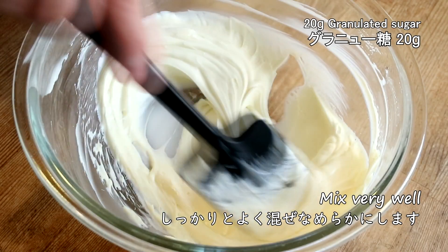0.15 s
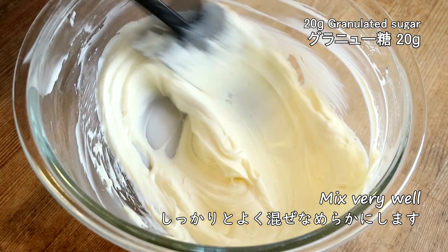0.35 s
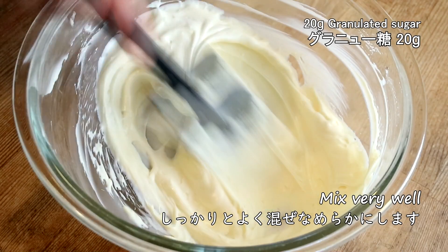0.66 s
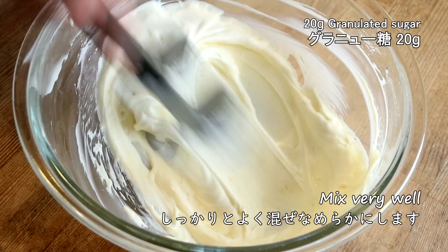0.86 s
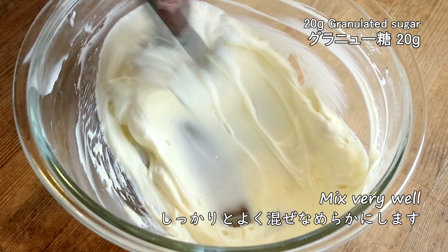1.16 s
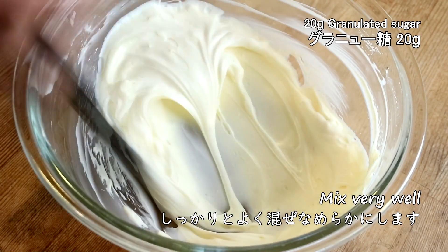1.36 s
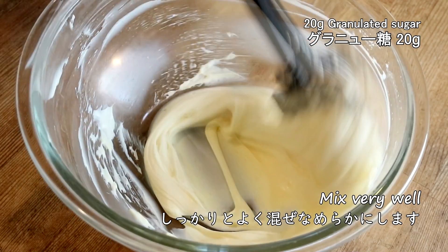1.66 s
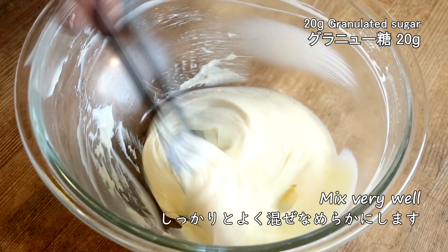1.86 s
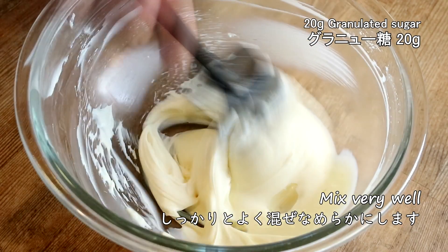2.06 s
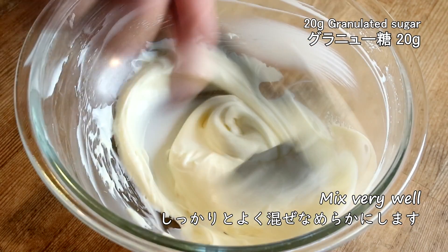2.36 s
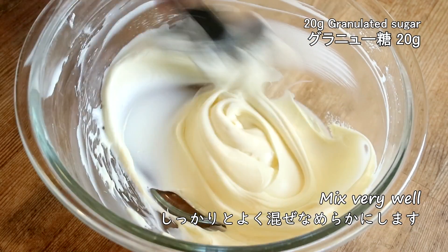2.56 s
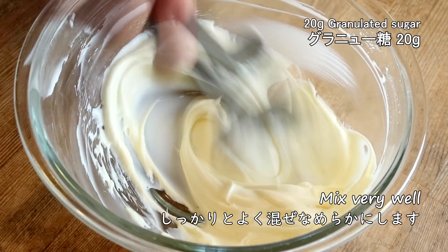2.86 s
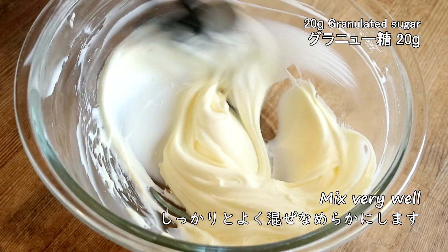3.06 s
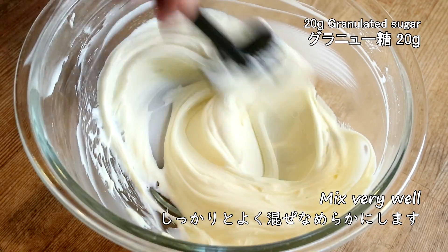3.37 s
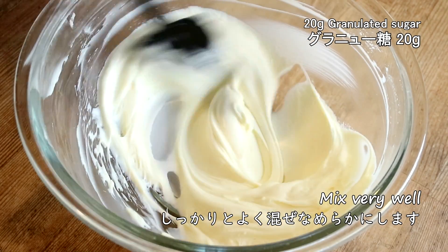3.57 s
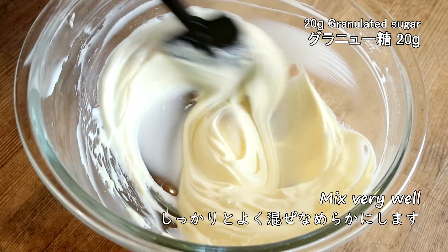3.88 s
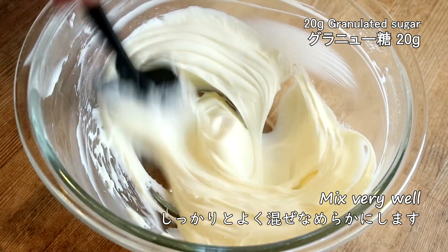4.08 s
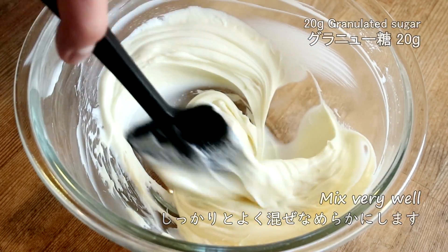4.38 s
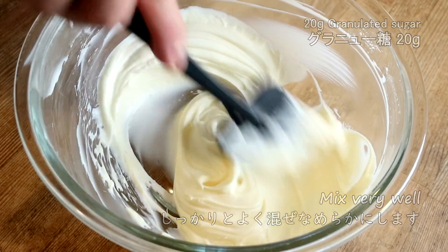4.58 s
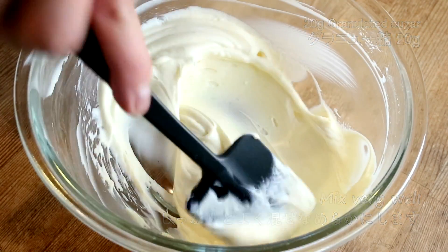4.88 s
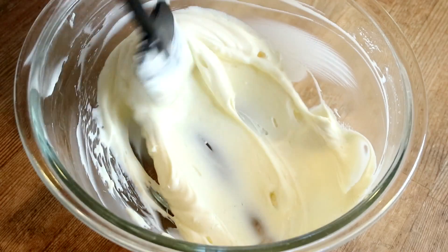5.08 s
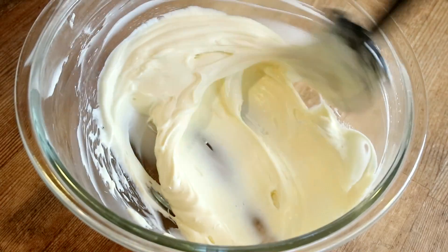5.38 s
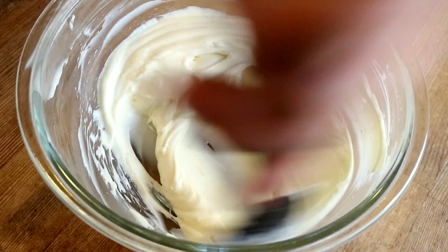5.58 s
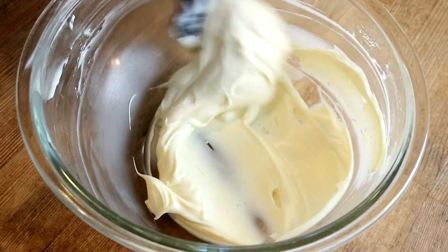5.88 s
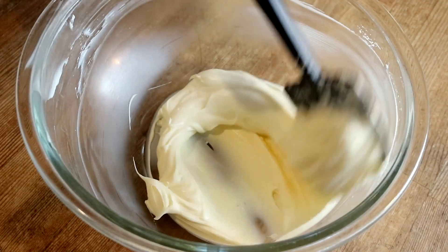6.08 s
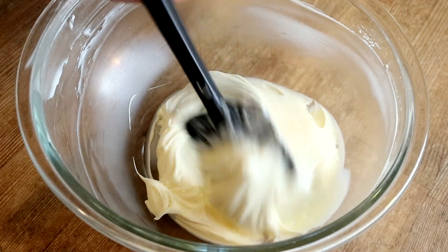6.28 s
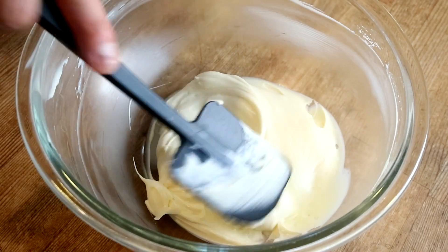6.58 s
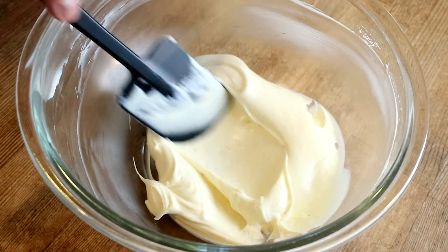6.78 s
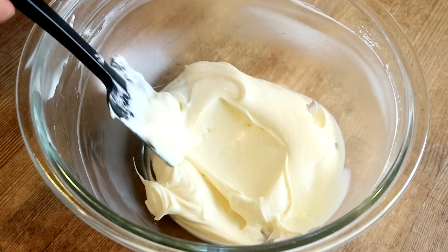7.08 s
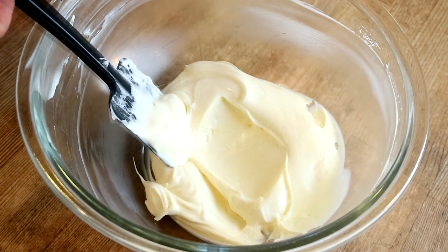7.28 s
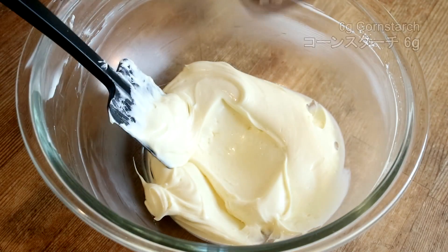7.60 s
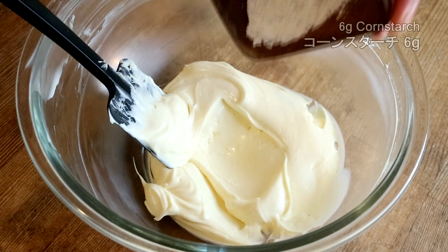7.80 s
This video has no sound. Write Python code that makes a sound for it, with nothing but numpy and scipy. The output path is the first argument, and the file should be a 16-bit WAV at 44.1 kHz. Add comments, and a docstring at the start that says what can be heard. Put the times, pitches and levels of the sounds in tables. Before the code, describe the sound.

A quiet kitchen with soft air noise and a faint low appliance hum, captured close to a glass bowl. At 0 s a short sticky smear with small wet clicks; at 0.4 a crisp double plop, then scattered squelches and soft table thuds around 0.7, 1.1 and 1.4. From about 2 to 2.7 light pops and crackling drags gather quickly. A big hollow gloop bursts at 2.75, followed by smears, low thumps and, at 2.99, one hard, short glassy knock with tiny rebounds. Further large, deep plops land at 3.25, 3.8 and 4.1, with busy wet slaps and thuds between, especially around 3.5. Mixing thins: a plop at 4.7, another at 5.1, faint squelches and a brief drag near 5.7 to 5.85. Barely audible rubbing ends by 6.7; a very faint smear at 7.4 marks the spatula being laid down, then hum and air until 8.

```python
"""Quiet kitchen: a silicone spatula beats thick cream batter in a glass bowl on a wooden table.
Pockets burst as damped cavity tones with torn-film noise; the blade smears as hiss and ringing grains.
Strokes thud in low table modes over a pressed rumble; one hard knock rings the bowl's modes.
Beneath lie shaped room noise and an appliance's sine hum; echoes and a diffuse tail form the room."""
import sys
import numpy as np
from scipy import signal
from scipy.fft import rfft, irfft, next_fast_len
from scipy.io import wavfile

SR = 44100
rng = np.random.default_rng(int(sys.argv[2]) if len(sys.argv) > 2 else 0)


def pcm_store(signal):
    """Save signal as 16-bit PCM."""
    levels = np.round(np.clip(np.atleast_2d(signal), -1, 1) * 32767)
    wavfile.write(sys.argv[1], SR, levels.astype(np.int16).T)


N = 350139

# Kitchen air spectrum. Each row: frequency in Hz, relative density in dB per Hz.
AIR_SPECTRUM = [(20, -15), (35, -7.5), (52, -6.5), (75, -1.5), (100, -10.5), (140, -6), (190, -14.5),
                (300, -11.5), (450, -15.5), (750, -18.5), (1300, -24.5), (3000, -27), (9000, -36.5),
                (14000, -47.5)]
# Left-right likeness of the air. Each row: frequency in Hz, likeness from -1 (opposed) to 1 (alike).
AIR_LIKENESS = [(25, 1), (60, 1), (150, 0.86), (300, 0.39), (640, 0.02), (1400, -0.14), (3000, -0.55),
                (12000, -0.6)]
AIR_RMS_DB = -59
# Appliance hum. Each row: frequency in Hz, rms in dB.
HUM_PARTIALS = [(59.4, -59), (118.6, -62.5), (237.3, -70.5), (328.4, -78), (980, -78.5)]

# Blade drags, the last as the spatula is laid down. Each row: peak time in seconds, peak drive in dB,
# length (sum of swell and fade time constants) in seconds, sticky treble against the dull part in dB.
DRAGS = [(0.0, -41.5, 0.05, -11.5), (0.052, -48, 0.038, -10), (0.777, -60, 0.037, -12),
         (1.362, -61, 0.048, 2.5), (1.47, -52.5, 0.04, -6), (2.023, -63.5, 0.26, -12),
         (2.198, -60, 0.081, -1), (2.285, -59, 0.078, -21), (2.336, -49.5, 0.011, 11.5),
         (2.442, -55.5, 0.071, 7), (2.559, -54.5, 0.08, -3), (2.633, -57, 0.07, -5), (2.756, -46, .1, -3),
         (2.946, -48.5, .03, -1), (3.01, -44.5, 0.16, -5.5), (3.263, -47, 0.038, -2),
         (3.345, -59, 0.054, 1), (3.49, -56.5, 0.37, -2), (3.537, -43, 0.033, -6),
         (3.622, -57, 0.076, -4.5), (3.783, -45.5, 0.045, -5.5), (3.857, -57, .12, -1.5),
         (4.082, -47.5, 0.0587, -6), (4.204, -60, 0.114, 3.5), (4.313, -49.5, 0.023, 6.5),
         (4.705, -49.5, 0.038, -2), (5.018, -63.5, 0.12, -9), (5.682, -53, 0.093, -12),
         (5.799, -65, 0.16, -2), (7.383, -67, 0.44, -3)]
SWELL_SHARE = 0.36  # of the drag length; the rest is fade
RUB_DB, MIXING_ENDS_S = -77.5, 6.7  # light rub between drags
# Colour of the dragging. Each row: grain pitch in Hz, relative gain in dB.
SMEAR_COLOUR = [(120, -5.5), (300, -14.5), (550, -1), (900, 6.5), (1600, 4.5), (2300, -4.5), (3500, -10.5),
                (6000, -9.5), (11000, -20), (16000, -42.5)]

# Blade presses the bowl on the table. Each row: time in seconds, level in dB before the thud trim.
PUSHES = [(0.002, -45.5), (0.678, -36), (1.041, -36.5), (1.355, -43.5), (2.022, -45), (2.561, -35.5),
          (2.861, -34), (2.996, -32), (3.533, -32), (4.604, -45), (4.663, -40), (4.983, -43)]
# Table and bowl under a push. Each row: multiple of TABLE_HZ, mean relative level in dB, t60 in seconds.
TABLE_MODES = [(0.578, -16, 0.8), (0.799, -8, 0.31), (0.998, 4, 0.21), (1.219, -5, .2), (1.6, -12.5, 0.25),
               (2.3, -13, 0.18)]
TABLE_HZ = 132.63

# Clearest bursting air pockets. Each row: time in seconds; plop, smack, squelch and spit level in dB
# before the trims in pops(); cavity, squelch and spit frequency in Hz.
POCKETS = [(0.003, -38, -48, -62, -66, 720, 2500, 6000), (0.0095, -41.5, -55, -56, -68, 720, 2600, 6000),
           (0.043, -43, -58, -53.5, -69, 760, 3500, 5200),
           (0.3863, -28.5, -38.5, -42.5, -53, 697, 2960, 8500),
           (0.401, -61, -31, -50, -47.5, 730, 2440, 5640), (0.405, -30.5, -58, -35.5, -58, 724, 3970, 5550),
           (0.6711, -40.5, -43, -48.5, -55, 820, 2590, 5360),
           (0.787, -49.5, -51, -46.5, -66, 760, 2920, 7000),
           (0.7936, -40, -42.5, -43, -52, 640, 3530, 6200), (1.0295, -53, -45, -51, -63, 810, 3570, 5800),
           (1.0885, -47, -55, -66, -78, 865, 2410, 6000), (1.125, -28.5, -36, -32.5, -40, 640, 4220, 7300),
           (1.352, -63, -62, -54.5, -68, 754, 3620, 6300), (1.4555, -50, -38.5, -50, -64, 840, 1850, 5800),
           (2.08, -49, -61, -77, -75, 726, 2360, 6000), (2.146, -46.5, -51, -61, -67, 546, 2650, 6000),
           (2.189, -50, -53, -57, -76, 760, 2900, 6000), (2.2072, -35, -31, -43.5, -53.5, 760, 2590, 5250),
           (2.228, -37, -55, -61, -80, 796, 2600, 6000), (2.2874, -50, -54, -61, -80, 596, 2500, 6000),
           (2.3215, -41.5, -39, -54, -62, 860, 2600, 6000),
           (2.3258, -30.5, -32.5, -37.5, -47, 925, 3830, 6100), (2.42, -57, -49, -41, -53, 760, 3500, 5200),
           (2.448, -65, -57, -46.5, -47.5, 758, 3380, 6200),
           (2.4979, -56, -57, -40.5, -60, 543, 3804, 5530),
           (2.509, -64, -62.5, -46.5, -61, 700, 4114, 5560),
           (2.537, -58.5, -51, -54, -71.5, 760, 2400, 6000),
           (2.5632, -43.5, -45, -55, -54.5, 691, 2560, 9500),
           (2.5866, -50.5, -56, -57, -58, 762, 3500, 6130),
           (2.6252, -57.5, -49.5, -52, -71, 760, 2397, 6000),
           (2.6847, -46.5, -42, -43, -55, 762, 2500, 7500),
           (2.6995, -56.5, -50, -49.5, -64, 762, 3750, 6300),
           (2.7153, -45.5, -34.5, -33.5, -66.5, 850, 3020, 6000),
           (2.7409, -12.5, -25.5, -19.5, -37, 595, 2950, 6800),
           (2.8552, -35.5, -28.5, -34.5, -45.5, 884, 2700, 5900),
           (2.9499, -35.5, -37, -26.5, -42, 840, 2790, 9500),
           (3.1082, -38.5, -36, -27.5, -36, 960, 3660, 4840),
           (3.2275, -69.5, -41.5, -41, -60.5, 762, 2780, 5500),
           (3.2586, -11.5, -36, -33, -40.5, 525, 2570, 5900),
           (3.3963, -25.5, -26.5, -26.5, -42.5, 720, 3092, 5760),
           (3.49, -59, -56, -57.5, -60.5, 765, 2922, 5300),
           (3.521, -31.5, -32.5, -47, -57, 640, 2503, 6000),
           (3.5311, -30, -29, -28, -65.5, 790, 2100, 6000), (3.537, -27, -28, -43.5, -49, 720, 2573, 5500),
           (3.6025, -55.5, -57, -45, -78, 760, 2520, 6000),
           (3.655, -48.5, -39, -33.5, -42, 750, 3000, 6040),
           (3.6645, -24.5, -31.5, -27, -61.5, 727, 3190, 6300),
           (3.746, -30.5, -37.5, -52.5, -64, 828, 2600, 6000),
           (3.759, -48, -36.5, -40.5, -64, 754, 2050, 6000),
           (3.7824, -12, -34, -23.5, -41, 555, 2920, 5600), (3.8728, -57, -61, -49, -64, 760, 2800, 6000),
           (3.933, -64.5, -60, -45, -61, 793, 3520, 5970),
           (4.021, -51.5, -52.5, -45.5, -49, 756, 3700, 7200),
           (4.061, -59.5, -58.5, -52, -61, 756.5, 3620, 6000),
           (4.0761, -12.5, -30, -30, -42, 560, 2368, 5200),
           (4.206, -53.5, -52, -48, -47.5, 760, 3807, 6400),
           (4.3005, -61, -49, -46.5, -39.5, 743, 3300, 9000), (4.35, -43, -48, -36.5, -55, 753, 2650, 6000),
           (4.627, -39.5, -44, -77, -84, 723, 2000, 6000), (4.6931, -23, -36.5, -45, -64, 630, 2400, 5200),
           (4.7176, -42, -37.5, -39.5, -70, 666, 3380, 6000), (4.8539, -53, -61, -52, -81, 762, 3030, 6040),
           (5.0997, -27, -33.5, -36.5, -46, 657, 3073, 8100),
           (5.106, -40.5, -58, -50.5, -47, 700, 3200, 5100), (5.649, -58, -53, -63, -80, 894, 2420, 6000),
           (5.68, -66, -52, -51, -72, 853, 2660, 5960), (5.703, -60, -49, -56, -73, 920, 2300, 6000),
           (5.846, -52.5, -52, -48.5, -59.5, 780, 3080, 6200)]
# Bowl and its air ringing with each plop. Each row: frequency in Hz, width in Hz, resonance gain in dB.
BOWL_AIR = [(306, 12, 3.5), (410, 26, -5), (553, 100, -4.5), (820, 170, 7)]
CAVITY_RISE_OCTAVES_PER_S = 3.3  # pitch climbs as the mouth widens
SLOP_DB, SLOP_DECAY_S = -12.5, 0.0056  # batter falling in, against the plop level in the table
BIG_POCKET_DB = -11  # plop level in the table
# A large pocket giving way jolts the bowl: smallest plop, delay, thud of a big pocket, dB per plop dB.
JOLT_FROM_DB, JOLT_DELAY_S, JOLT_DB, JOLT_FOLLOWS = -30, 0.0076, -30, 0.84

# Knock: a graze, the blow, two rebounds. Each row: time in seconds, level in dB before KNOCK_TRIM_DB.
KNOCK_CONTACTS = [(2.985, -21.5), (2.9894, -1), (2.9979, -16), (3.004, -32)]
KNOCK_TRIM_DB = -0.5
# Bowl damped by the batter. Each row: frequency in Hz, relative level in dB, t60 in seconds.
BOWL_MODES = [(585, -12.5, 0.023), (786, -11, 0.055), (1074, -9.5, 0.035), (1300, -3, 0.025),
              (1599, -4.5, 0.019), (2035, -6, 0.013), (1950, -25.5, 0.1), (2300, -12, 0.016),
              (2590, -10.5, 0.02), (3580, -16, 0.017), (4499, -16.5, 0.003), (7900, -23.5, 0.0048),
              (11100, -27.5, 0.005)]

# Echoes of table, counter and walls. Each row: delay in seconds, level in dB before the echo low-pass.
ECHOES = [(0.012, -19.5), (0.0152, -21), (0.017, -16), (0.0189, -15), (0.022, -17.5), (0.0284, -19),
          (0.0353, -24.5), (0.047, -22.5), (0.0539, -24)]
# Reverberation colour. Each row: frequency in Hz, energy in dB against direct sound before wet_db.
ROOM_COLOUR = [(100, 1), (300, -6.5), (600, -10.5), (1200, -11.5), (2500, -5.5), (5000, -5.5), (9000, 3.5),
               (12000, -6.5), (15000, -22)]
# Reverberation decay. Each row: frequency in Hz, t60 in seconds.
ROOM_T60 = [(100, 0.36), (350, .29), (560, 0.31), (900, .27), (1500, 0.27), (3500, 0.21), (8000, 0.11),
            (15000, 0.1)]
# Tail build-up; the bowl shades low pitches from near surfaces. Each row: frequency in Hz, time in seconds.
ROOM_BUILD = [(150, 0.017), (600, 0.015), (1500, 0.005), (4000, 0.0021)]
# Left-right likeness of tail and scatter. Each row: frequency in Hz, likeness from 0 to 1.
ROOM_LIKENESS = [(100, 1), (600, 1), (1500, 0), (4000, 0), (12000, 0)]
# Scatter from the glass wall. Each row: frequency in Hz, level in dB against direct sound.
WALL_SCATTER = [(300, -29), (700, -22.5), (1400, -5), (2500, -12), (6000, 1), (12000, 1.5)]
# Pitches favoured by the bowl's hollow. Each row: frequency in Hz, gain in dB.
HOLLOW = [(230, -9.5), (320, -2.5), (390, -2.5), (520, 4), (650, 3.5), (830, 1), (1020, -1.5), (1290, 0.5),
          (1600, 1), (1950, 4), (2500, 1), (3400, -0.5), (5500, -2.5), (9000, -7.5), (12000, -7),
          (15000, -10)]
# Sound bends round the bowl to the right. Each row: frequency in Hz, right-channel lag in seconds.
RIGHT_LAG = [(550, 0.0003), (900, 0.00015), (1300, 0.00028), (2500, 0.00027), (4000, 0.00023),
             (6000, .00019)]
# Batter lies to the left. Each row: frequency in Hz, left minus right in dB.
BATTER_LEAN = [(100, -2.5), (250, 0.5), (550, 4.5), (900, 13), (1400, 6.5), (2200, 0), (4000, -1),
               (12000, 1)]
# Struck glass radiates unevenly. Each row: frequency in Hz, left minus right in dB.
KNOCK_LEAN = [(200, -1), (650, 8.5), (1300, 8.5), (2200, -3), (4000, -1), (12000, 0.5)]
CUTOFF_HZ = 15500


def from_db(db):
    """Decibels to gain."""
    return 10 ** (np.asarray(db) / 20)


def rms_one(x):
    """Scale to rms 1."""
    return x / np.sqrt(np.mean(x ** 2) + 1e-20)


def at_hz(points, hz):
    """Interpolate a table on a log-frequency axis."""
    f, value = np.transpose(points)
    return np.interp(np.log(np.maximum(hz, 1)), np.log(f), value)


def band(x, low_hz, high_hz, order=2):
    """Butterworth band-pass."""
    edges_hz = [low_hz, min(high_hz, SR * .45)]
    return signal.sosfilt(signal.butter(order, edges_hz, "band", fs=SR, output="sos"), x)


def resonate(x, hz, width_hz):
    """One resonance of gain 1 at its peak."""
    r = np.exp(-np.pi * width_hz / SR)
    zeros = np.array([1, 0, -1]) * (1 - r * r) / 2
    poles = [1, -2 * r * np.cos(2 * np.pi * hz / SR), r * r]
    return signal.lfilter(zeros, poles, x)


def add(out, s, sound):
    """Mix a short sound in at time s."""
    at = round(s * SR)
    out[max(at, 0):at + len(sound)] += sound[max(-at, 0):N - at]


def stereo_bands(likeness, size):
    """Half-octave bands of stereo noise of even density: yields (centre Hz, 2 x size)."""
    lead_in = 4000  # discarded while the filters settle
    white = rng.standard_normal((2, 2, size + lead_in))
    edges_hz = 20 * 2 ** (np.arange(21) / 2)
    for k, (low, high) in enumerate(zip(edges_hz, edges_hz[1:])):
        mid, side = band(white[k % 2], low, high)[:, -size:]  # neighbours use separate noise
        hz = np.sqrt(low * high)
        alike = np.clip(at_hz(likeness, hz), -.99, .99)
        yield hz, np.sqrt((1 + alike) / 2) * mid + np.sqrt((1 - alike) / 2) * side * [[1], [-1]]


def burst(x, db):
    """Level a short sound as if all its energy came within 7 ms."""
    return from_db(db) * x * np.sqrt(.007 * SR) / np.linalg.norm(x)


def struck(modes, t):
    """Ring of a body after one blow: decaying sines of alternating sign."""
    ring = 0
    for k, (hz, db, t60) in enumerate(modes):
        ring = ring + (-1) ** k * from_db(db - 60 * t / t60) * np.sin(2 * np.pi * hz * t)
    return ring


def background():
    """Steady shaped air noise, dull at the very top, plus appliance hum partials."""
    air = sum(from_db(at_hz(AIR_SPECTRUM, hz)) * noise for hz, noise in stereo_bands(AIR_LIKENESS, N))
    air = signal.sosfilt(signal.butter(14, 11300, fs=SR, output="sos"), air)
    t = np.arange(N) / SR
    hum = 0
    for hz, db in HUM_PARTIALS:
        hum = hum + np.sqrt(2) * from_db(db) * np.sin(2 * np.pi * (hz * t + rng.random()))
    return from_db(AIR_RMS_DB) * rms_one(air) + hum


def drag_pressure():
    """Drags swell and fade exponentially over a steady rub: gains of the dull and the sticky part."""
    t = np.arange(N) / SR
    dull = sticky = from_db(RUB_DB) * np.clip((MIXING_ENDS_S - t) / 0.18, 0, 1)
    for s, db, length_s, treble_db in DRAGS:
        age = np.maximum((s - t) / SWELL_SHARE, (t - s) / (1 - SWELL_SHARE))
        stroke = from_db(db) * np.exp(-age / length_s)
        dull = np.maximum(dull, stroke)
        sticky = np.maximum(sticky, stroke * from_db(treble_db))
    return dull, sticky


def smear(pressure, stickiness, grains_per_s=1900, grain_db=4.0, clump_db=5.0, grain_cycles=11,
          friction_db=-4.0, treble_hz=2800, top_hz=10500):
    """Blade friction hisses; tiny bubbles and sugar grains crackle in clumps, each ringing at a pitch."""
    t = np.arange(N) / SR
    knots_s = np.arange(0, N / SR, 1 / 70)
    clumps = from_db(clump_db * np.interp(t, knots_s, rng.standard_normal(len(knots_s))))
    hits = (rng.random(N) < grains_per_s / SR) * rng.choice([-1, 1], N)
    grains = hits * from_db(grain_db * np.minimum(rng.exponential(1, N), 4))
    pitches_hz = np.geomspace(200, 12000, 24)
    dealt = rng.integers(0, len(pitches_hz), N)
    crackle = 0
    for k, hz in enumerate(pitches_hz):
        ringing = resonate(grains * (dealt == k) + 1e-18, hz, 2 * hz / grain_cycles)
        crackle = crackle + ringing * from_db(at_hz(SMEAR_COLOUR, hz))
    friction = from_db(friction_db) * rms_one(band(rng.standard_normal(N), 750, 2800, order=1))
    drag = band(rms_one(crackle) + friction, 100, top_hz, order=8)
    dull = signal.sosfiltfilt(signal.butter(2, treble_hz, fs=SR, output="sos"), drag)
    return clumps * (dull * pressure + (drag - dull) * stickiness)


def rumble(pressure, rumble_db=-1.0, follows=0.81, low_hz=70, high_hz=210, pressed_db=-50):
    """Bowl shifting on the table under the blade: low noise following the pressure."""
    shifting = rms_one(band(rng.standard_normal(N), low_hz, high_hz))
    return from_db(pressed_db + rumble_db) * (pressure / from_db(pressed_db)) ** follows * shifting


def thuds(push_s=0.018, thud_trim_db=1.0):
    """Soft pushes and large-pocket jolts swell into low table modes of varied pitch and strength."""
    out, t = np.zeros(N), np.arange(SR // 2) / SR
    jolts = [(s + JOLT_DELAY_S, JOLT_DB + JOLT_FOLLOWS * (db - BIG_POCKET_DB))
             for s, db, *_ in POCKETS if db > JOLT_FROM_DB]
    for s, db in [*PUSHES, *jolts]:
        modes = []
        for ratio, level_db, t60 in TABLE_MODES:
            hz = TABLE_HZ * ratio * (1 + 0.045 * rng.normal())
            modes.append((hz, level_db + 2 * rng.normal(), t60))
        thud = struck(modes, t) * (1 - np.exp(-t / push_s))
        add(out, s - .006, from_db(db + thud_trim_db) * thud / np.abs(thud).max())
    return out


def tear(t, decay_s, grain_db, spray_db, trail_db=-15.0, trail_s=0.0084, fray_s=0.00086):
    """A batter film frays and rips at t = 0: one snap, a quick spray, then stray ticks of parting threads."""
    snap = np.where(t == 0, 1, 0)
    grains = rng.standard_normal(len(t)) * from_db(grain_db * rng.standard_normal(len(t)))
    spray = grains * np.exp(-np.maximum(t / decay_s, -t / fray_s))
    trail = rng.standard_normal(len(t)) ** 5 * np.exp(-t / trail_s) * (t > 0)  # 5th power: sparse ticks
    spray = from_db(spray_db) * spray / np.linalg.norm(spray)
    return snap + spray + from_db(trail_db) * trail / np.linalg.norm(trail)


def pops(pockets, cavity_cycles=7.8, opening_s=0.00098, smack_hz=1220, squelch_width_hz=700,
         plop_trim_db=-1.64, squelch_trim_db=-1.5, spit_trim_db=0.5, count=4):
    """Opening pockets ring as damped cavities; torn film adds smack, squelch, spit. Dealt to count rows."""
    out, t = np.zeros((count, N)), np.arange(-256, 2048) / SR
    open_s = np.maximum(t, 0)
    for k, pocket in enumerate(pockets):
        s, plop_db, smack_db, squelch_db, spit_db, cavity_hz, squelch_hz, spit_hz = pocket
        # cavity_hz is reached 2 ms after opening
        rising_hz = cavity_hz * 2 ** (CAVITY_RISE_OCTAVES_PER_S * (open_s - .002))
        cycles = np.cumsum((t > 0) * rising_hz) / SR
        fade = from_db(-60 * open_s * cavity_hz / cavity_cycles)
        cavity = np.sin(2 * np.pi * cycles) * fade * (1 - np.exp(-open_s / opening_s))
        air = sum(from_db(db) * resonate(cavity, hz, width_hz) for hz, width_hz, db in BOWL_AIR)
        slop = band(rng.standard_normal(len(t)) * open_s * np.exp(-open_s / SLOP_DECAY_S), 270, 830)
        plop = burst(cavity + air, plop_db + plop_trim_db) + burst(slop, plop_db + SLOP_DB)

        film = band(tear(t, 0.0038, grain_db=5.0, spray_db=6.5, trail_db=-9), 620, 1500)
        smack = burst(resonate(film, smack_hz, 390) + 1.3 * film, smack_db)

        wet = tear(t, 0.0027, grain_db=3.5, spray_db=0.5, trail_db=-12.0)
        wet = band(wet, 0.51 * squelch_hz, 1.3 * squelch_hz, order=3)
        squelch = resonate(wet, squelch_hz, squelch_width_hz) + 0.27 * wet
        squelch = burst(squelch, squelch_db + squelch_trim_db)

        droplets = tear(t, 0.0016, grain_db=8, spray_db=-1.0, trail_db=-15.0)
        spit = burst(band(droplets, 0.66 * spit_hz, 1.52 * spit_hz), spit_db + spit_trim_db)
        add(out[k % count], s + t[0], plop + smack + squelch + spit)
    return out


def knock(clatter_db=-24.5, clatter_t60=0.063, crack_db=-27.5, low_cut_hz=300):
    """The spatula's stiff core cracks on glass and rebounds; the bowl rings and clatters on the table."""
    out, t = np.zeros(N), np.arange(SR // 2) / SR
    for s, db in KNOCK_CONTACTS:
        clatter = rms_one(band(rng.standard_normal(len(t)), 1100, 3400, order=3))
        clatter = clatter * from_db(clatter_db - 60 * t / clatter_t60)
        crack = burst(band(rng.standard_normal(len(t)) * np.exp(-t / 0.0018), 1000, 5700), crack_db)
        add(out, s, from_db(KNOCK_TRIM_DB + db) * (struck(BOWL_MODES, t) + clatter + crack))
    return signal.sosfilt(signal.butter(2, low_cut_hz, "high", fs=SR, output="sos"), out + 1e-18)


def kitchen(x, wet_db, lean_db, echo_cut_hz=1500, scatter_s=0.00038):
    """Direct sound, bowl scatter, dull echoes and diffuse tail, then hollow, lean and right-channel lag."""
    t = np.arange(16384) / SR
    paths = np.zeros(len(t))
    for delay_s, db in ECHOES:
        paths[round(delay_s * SR)] += from_db(db)
    paths = signal.lfilter(*signal.butter(1, echo_cut_hz, fs=SR), paths)
    paths[0] = 1  # direct sound
    response = np.array([paths, paths])
    scatter = t * np.exp(-t / scatter_s)
    for hz, noise in stereo_bands(ROOM_LIKENESS, len(t)):
        build = 1 - np.exp(-(t / at_hz(ROOM_BUILD, hz)) ** 2)
        fade = from_db(-60 * t / at_hz(ROOM_T60, hz)) * build
        response += from_db(wet_db + at_hz(ROOM_COLOUR, hz)) * noise * fade / np.linalg.norm(fade)
        response += from_db(at_hz(WALL_SCATTER, hz)) * noise * scatter / np.linalg.norm(scatter)
    size = next_fast_len(N + len(t))
    hz = np.fft.rfftfreq(size, 1 / SR)
    lean = from_db(at_hz(lean_db, hz) / 2 * [[1], [-1]])
    lean = lean / np.sqrt(np.mean(lean ** 2, axis=0))  # keeps the two-channel power
    lag = np.exp(-2j * np.pi * hz * at_hz(RIGHT_LAG, hz) * [[0], [1]])
    colour = from_db(at_hz(HOLLOW, hz)) * lag * lean
    return irfft(rfft(x, size) * rfft(response, size) * colour, size)[:, :N]


def scene():
    """Pop rows, smear and knock get room responses of their own; thuds, rumble and background stay dry."""
    pressure, stickiness = drag_pressure()
    sources = [*pops(POCKETS), smear(pressure, stickiness)]
    batter = sum(kitchen(source, wet_db=-2.5, lean_db=BATTER_LEAN) for source in sources)
    struck_bowl = kitchen(knock(), wet_db=-2.5, lean_db=KNOCK_LEAN)
    return batter + struck_bowl + background() + thuds() + rumble(pressure)


def record(dry):
    """Clip at full scale, then cut the top steeply."""
    top_cut = signal.cheby2(14, 70, CUTOFF_HZ + 1000, fs=SR, output="sos")  # 70 dB down at this edge
    return signal.sosfilt(top_cut, np.clip(dry, -1, 1))


dry = scene()
out = record(dry)
pcm_store(out)
```